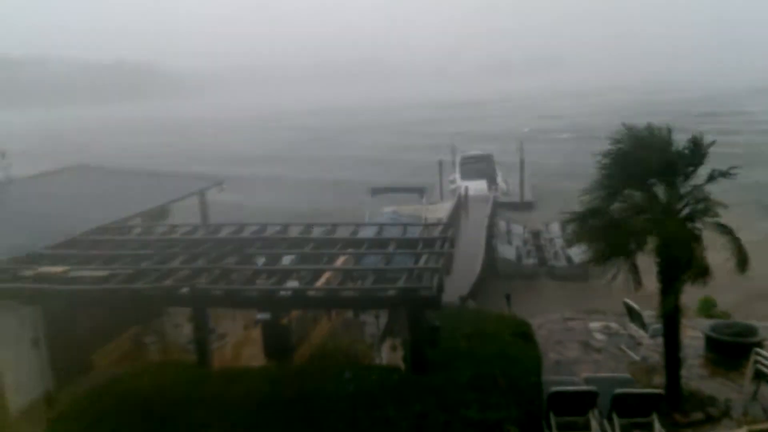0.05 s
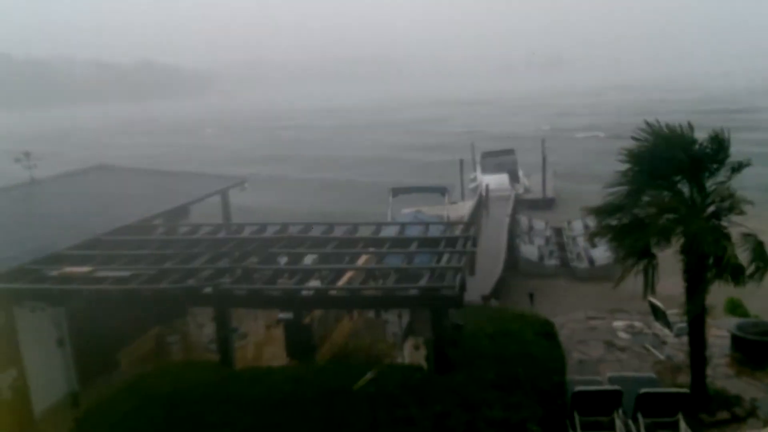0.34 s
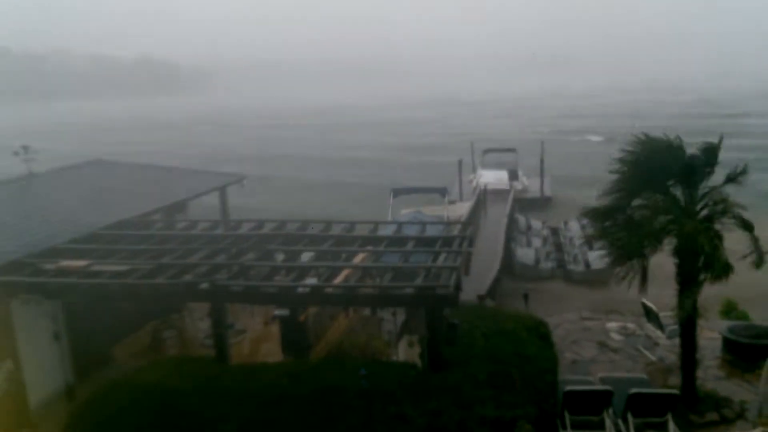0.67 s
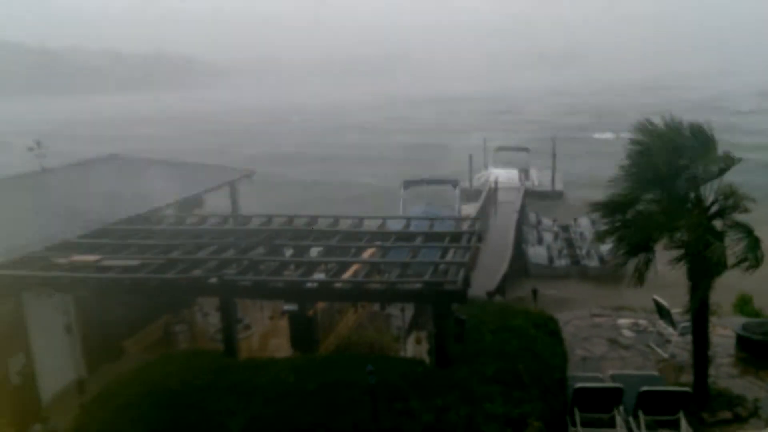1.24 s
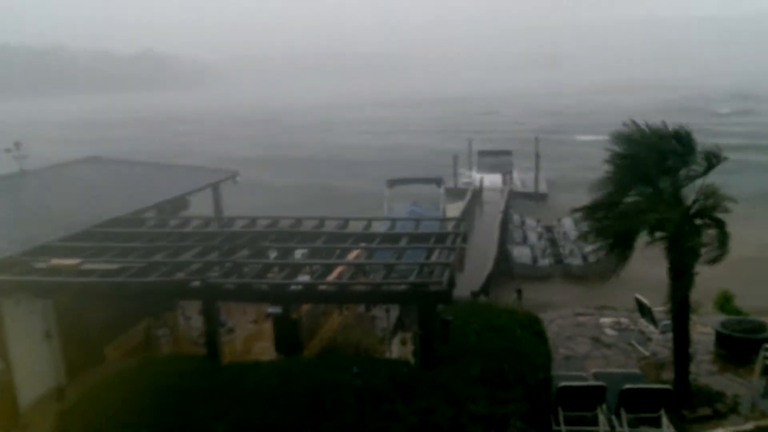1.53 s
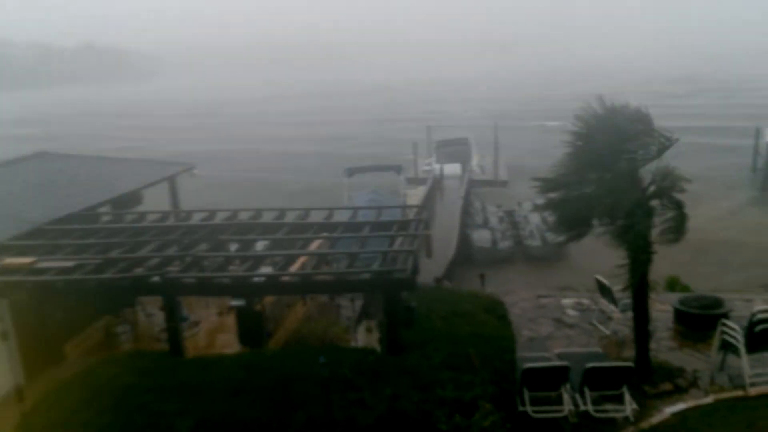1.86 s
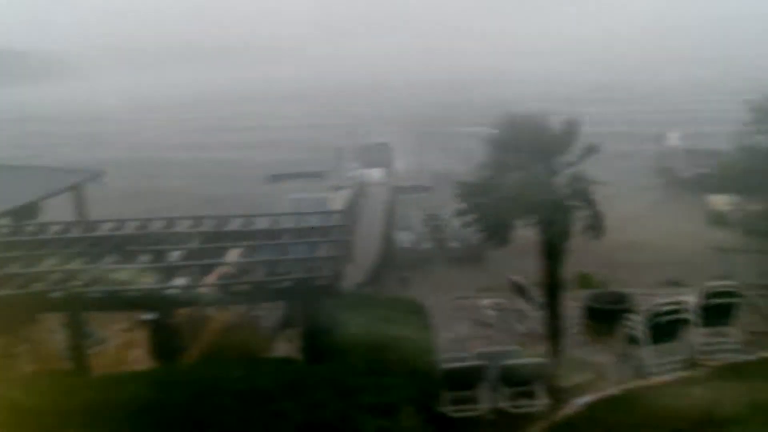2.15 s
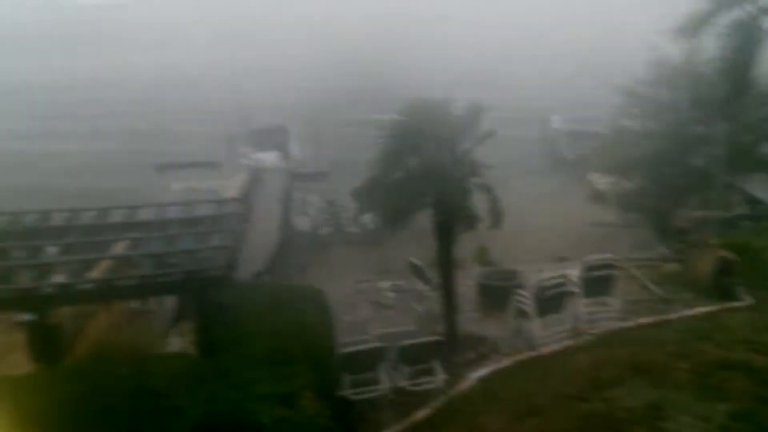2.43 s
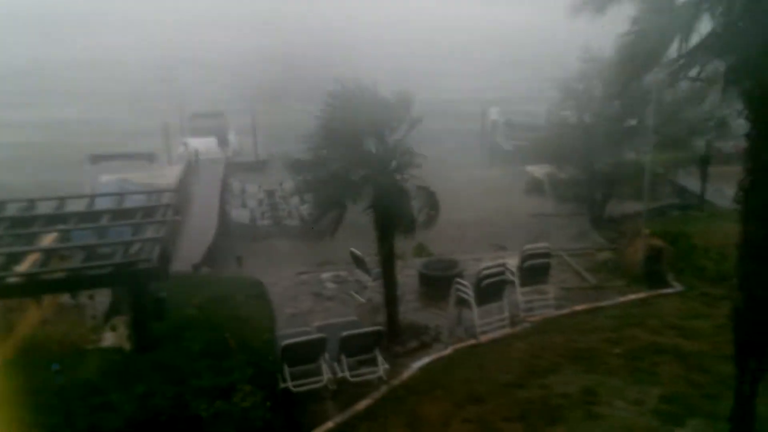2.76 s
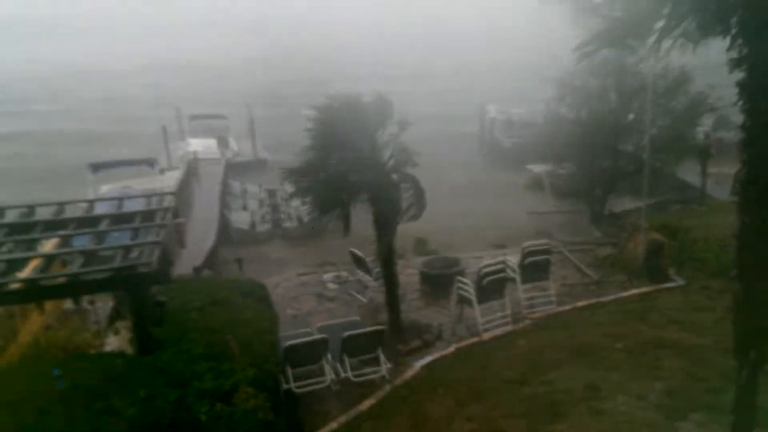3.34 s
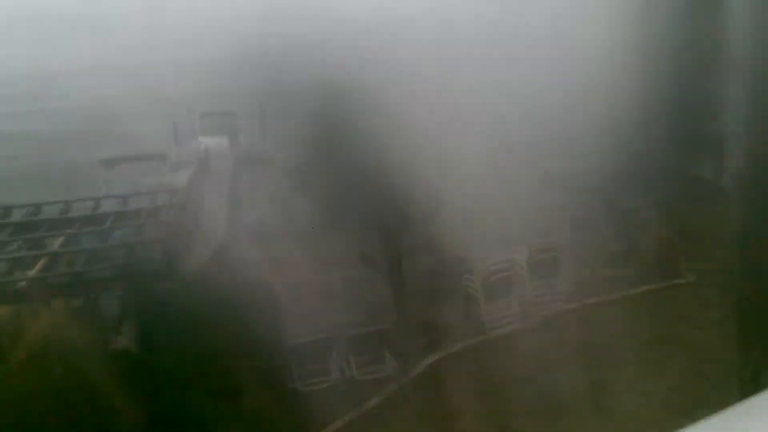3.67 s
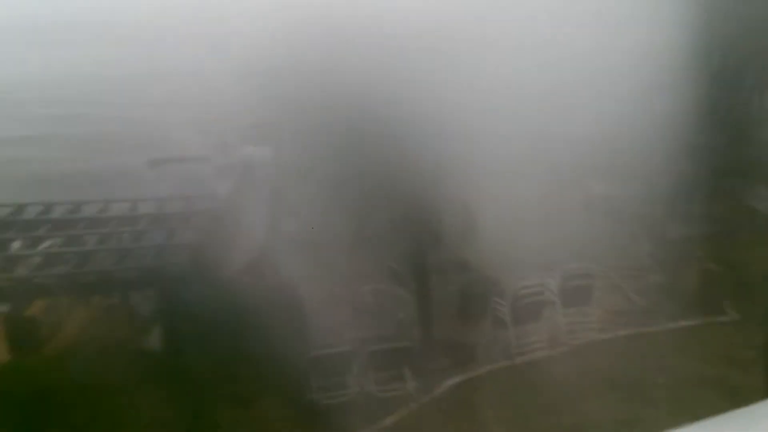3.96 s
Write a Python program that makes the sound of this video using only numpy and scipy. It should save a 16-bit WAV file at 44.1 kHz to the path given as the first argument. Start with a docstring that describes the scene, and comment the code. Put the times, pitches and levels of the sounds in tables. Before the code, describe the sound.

Storm wind buffets the microphone, with rushing rain and crackling spray.

```python
"""Storm wind rumbles and flutters in both ears, driving rain across a lakeside yard straight onto the
two microphone ports of a hand-held camera. Eddies buffet each port on its own. The right port hears
the rush of rain and spits with spray; water seals it for an instant, then for good at about 2.7 s,
and gusts flap the film. The left port is wet throughout and thumps under the big eddies.
A wet port sounds hollow and dull, and drops tick on it."""
import sys
import numpy as np
from scipy import signal
from scipy.fft import rfft, irfft
from scipy.io import wavfile
from scipy.ndimage import uniform_filter1d, minimum_filter1d

SR = 44100
rng = np.random.default_rng(int(sys.argv[2]) if len(sys.argv) > 2 else 0)


def int16_out(signal):
    """Quantize to a 16-bit WAV file."""
    q = np.round(np.clip(np.atleast_2d(signal).T, -1, 1) * 32767)
    wavfile.write(sys.argv[1], SR, q.astype(np.int16))


N = 176400

# Colour of wind fluttering on a film of water. Each row: frequency in Hz, relative level in dB.
FILM_FLUTTER = [(100, 3.5), (400, 3), (800, 1.5), (1300, 5.5), (1700, -5.5), (2300, -17), (3200, -29),
                (5000, -44), (9000, -75), (16000, -85)]
# Colour of rain heard through a wet port. Each row: frequency in Hz, relative level in dB.
MUFFLED_RAIN = [(200, 2.5), (700, 18.5), (1300, -7), (2300, -9), (3200, -30), (4300, -68), (6000, -71),
                (7300, -37), (10000, -63), (16000, -46)]
LEFT, RIGHT = 0, 1


def from_db(db):
    return 10 ** (np.asarray(db) / 20)


def unit_rms(x):
    return x / np.sqrt(np.mean(x ** 2) + 1e-20)


def low_pass(x, hz, order):
    return signal.sosfilt(signal.butter(order, hz, fs=SR, output="sos"), x)


def automation(rows):
    """One curve per column, drawn through rows that begin with a time in seconds."""
    times, *columns = np.transpose(rows)
    return [np.interp(np.arange(N) / SR, times, column) for column in columns]


def on_port(rows, side):
    """The events that strike one port, without the port column."""
    return [row[:-1] for row in rows if round(row[-1]) == side]


def noise(colour):
    """Noise of the given colour at an rms of 1."""
    hz, db = np.transpose(colour)
    bins = np.maximum(np.arange(N // 2 + 1) * SR / N, 1)
    gain = from_db(np.interp(np.log(bins), np.log(hz), db)) * np.minimum(bins / hz[0], 1)
    return unit_rms(irfft(rfft(rng.standard_normal(N)) * gain, N))


def drift(rate_hz):
    """A smooth random wander at an rms of 1."""
    return unit_rms(low_pass(rng.standard_normal(N + SR), rate_hz, order=2)[SR:])


def bursts(rows):
    """Envelope of bell-shaped bursts. Each row: centre in seconds, level in dB, length in seconds."""
    power = np.zeros(N)
    for s, db, length in rows:
        i = np.arange(max(int((s - 2 * length) * SR), 0), min(int((s + 2 * length) * SR), N))
        power[i] += from_db(db) ** 2 * np.exp(-np.pi * ((i / SR - s) / length) ** 2)
    return np.sqrt(power)


def shower(per_s, floor_db, spread_db, mean_length_s):
    """Envelope of drops landing at random times, most of them small."""
    gap_draw, size_draw, length_draw = rng.random((600, 3)).T
    times = np.cumsum(-np.log(gap_draw)) / per_s
    levels = floor_db + spread_db * np.minimum(-np.log(size_draw), 3)
    lengths = mean_length_s * (.5 + length_draw)
    return bursts(np.column_stack([times, levels, lengths])[times < N / SR])


def eddies(swing_db):
    """Gain of eddies tumbling past a port: quick lumps around a steady mean power."""
    lumps = from_db(swing_db * np.clip(drift(rate_hz=93), -3, 2))
    return lumps / np.sqrt(uniform_filter1d(lumps ** 2, size=4000))


def wind(side, gust_db, rumble_colour, flutter_colour, rumble_db, flutter_db, eddy_db, rumble_follow):
    """Low pressure swings and a lumpy flutter rise with the gust; single hard eddies punch through."""
    # Hard eddies. Each row: time in seconds, relative level in dB, port (0 left, 1 right).
    punches = [(0.046, -13, 0), (0.075, -7, 1), (0.132, 0, 1), (0.189, -5, 1), (0.204, -7, 0),
               (0.355, -5.5, 0), (0.393, -5, 0), (0.395, -2.5, 1), (0.579, -5, 0), (0.877, -10, 0),
               (0.949, -2, 1), (1.137, -4.5, 0), (1.158, 1, 1), (1.4, -9, 0), (1.552, -8.5, 0),
               (1.592, -7.5, 0), (1.908, -9, 0), (2.332, -7, 1), (2.55, -5.5, 0), (3.003, -7, 0),
               (3.101, -9, 0), (3.213, -4, 0), (3.255, -5, 0), (3.349, -2, 0), (3.61, -7, 0),
               (3.662, -5.5, 0), (3.994, -6, 0)]
    buffets = bursts([(s, db - 1.5, 0.0084) for s, db in on_port(punches, side)])
    lumps = eddies(eddy_db)
    swell_db = rumble_follow * (gust_db - np.median(gust_db)) + 2.5 * drift(rate_hz=12.6)
    rumble = from_db(rumble_db + swell_db) * lumps ** 0.35 * noise(rumble_colour)
    air = noise(flutter_colour)
    body = signal.sosfiltfilt(signal.butter(2, 830, fs=SR, output="sos"), air)
    fizz = (air - body) * (lumps / 2) ** 0.31  # the top opens up with the hardest eddies
    flutter_gain = from_db(flutter_db + gust_db) * lumps
    return rumble + np.hypot(flutter_gain, buffets) * (body + fizz)


def singing_rain():
    """Rain hiss sings in the left port's resonance, which moves with the water in it."""
    # Each row: time in seconds, frequency in Hz, level in dB.
    resonance = [(0, 5930, -77), (1.8, 5570, -65), (2.8, 6000, -65), (3.08, 5500, -50), (3.26, 5400, -55),
                 (3.6, 5200, -62), (4, 5600, -59)]
    # Broad hiss around it. Each row: frequency in Hz, relative level in dB.
    skirt = [(2000, 0), (4500, 0), (6000, -16), (7500, -5), (10000, -26), (16000, -9)]
    hz, db = automation(resonance)
    width_hz = 600
    phase = 2 * np.pi * np.cumsum(hz) / SR
    crest = drift(width_hz / 2) * np.cos(phase) + drift(width_hz / 2) * np.sin(phase)
    return from_db(db) * (crest + from_db(-4) * noise(skirt))


def rain_rush():
    """The rush of rain swells and sinks through the open port."""
    # Each row: time in seconds, level in dB that the rain wavers around.
    swells = [(0, -30), (.4, -32), (.7, -26), (1.2, -45), (1.6, -24), (1.85, -35), (2.3, -27),
              (2.62, -24.5)]
    # Each row: frequency in Hz, relative level in dB.
    colour = [(200, 24.5), (700, 14.5), (1300, -1), (2300, -13), (3200, -0.5), (4400, 1.5), (5600, 8),
              (6300, 2.5), (7300, -6.5), (10000, -14), (16000, -35)]
    level_db = automation(swells)[0] + 2.3 * drift(rate_hz=1.4)
    return from_db(level_db) * noise(colour)


def struck_port(envelope, modes, crack_db, dull_hz):
    """Water hits ring the port's resonances; a little of the bare crack gets past them."""
    strike, crack = envelope * rng.choice([-1, 1], (2, N)) + 1e-18
    ring = 0
    for k, (hz, width_hz, db) in enumerate(modes):
        radius = np.exp(-np.pi * width_hz / SR)
        feedforward = np.array([1, 0, -1]) * (1 - radius ** 2) / 2
        feedback = [1, -2 * radius * np.cos(2 * np.pi * hz / SR), radius ** 2]
        ring = ring + (-1) ** k * from_db(db) * signal.lfilter(feedforward, feedback, strike)
    return low_pass(ring, dull_hz, order=4) + from_db(crack_db) * low_pass(crack, hz=8200, order=1)


def spray(gust_db, is_open):
    """Water torn up in the right port: big spits and, while it is open, sizzle and fine spray."""
    # Bursts of spray. Each row: time in seconds, relative level in dB, length in milliseconds.
    spit_hits = [(0.034, 15, 1.5), (0.132, -1, 1.9), (0.143, -9, 1), (0.185, 3, 1.7), (0.217, 4, 1.7),
                 (.394, -13, 1.7), (0.41, -14.5, 1.5), (0.545, -22, 3.9), (0.587, -13, 0.96),
                 (.623, -18.5, 1), (0.741, -12, 1.3), (0.825, -20, 3.5), (.837, -10, 1.1),
                 (0.895, -10, 1.6), (.951, -11, 0.7), (.981, -4, 0.56), (1.016, -17, 1.7),
                 (1.071, -12, 2.8), (1.09, -13, 2), (1.12, -15, 1.6), (1.155, -6, 2.1), (1.173, 3, 2.1),
                 (1.211, -21.5, 3.7), (1.22, 3, 0.86), (1.298, -3, 1.6), (1.329, -12, 1.1),
                 (1.412, -15, 1.4), (1.467, -17, 1.4), (1.476, -20, 2), (1.655, -12, 0.95),
                 (1.764, -9, 1.6), (1.912, -10, 1.2), (1.961, -17, 4.3), (1.976, -15, 1.6),
                 (2.012, -9, 0.77), (2.194, -15, 0.58), (2.224, -14.5, 5.2), (2.239, -5, 0.96),
                 (2.277, -12, 3.6), (2.359, -17, 1.0), (2.669, 0, 3.6)]
    # Longer bursts. Each row: time in seconds, relative level in dB, length in seconds.
    splatters = [(.19, -15, 0.0084), (.55, -20.5, 0.015), (.945, -24.5, 0.011), (1.16, -23, 0.011),
                 (1.29, -18.5, 0.023), (1.475, -20.5, 0.019)]
    # Resonances of the open port. Each row: frequency in Hz, width in Hz, gain in dB.
    open_modes = [(1470, 910, 9), (3500, 2470, 4.5), (5500, 1300, 8.5)]
    spits = bursts([(s, db + 5, ms / 1000) for s, db, ms in spit_hits])
    halos = [(s, db - 32.5, 0.014) for s, db, _ in spit_hits]  # a short sizzle wraps each spit
    grain = from_db(7 * drift(rate_hz=400))
    sizzle = bursts(halos + list(splatters)) * grain
    fine = shower(per_s=45, floor_db=-26.5, spread_db=5, mean_length_s=0.00071)
    fine *= from_db(0.15 * (gust_db - np.median(gust_db)))
    return struck_port(spits + is_open * (sizzle + fine), open_modes, crack_db=-9, dull_hz=6140)


def thumps():
    """Big slow eddies thump the left port: a swing or two of low pressure at a wandering pitch."""
    # Each row: time in seconds, relative level in dB, port (0 left, 1 right). Only the left rows play.
    big_eddies = [(0.046, -7, 0), (0.05, 1.5, 1), (0.129, -3, 1), (0.213, -6, 0), (0.285, -6, 1),
                  (0.313, -9, 0), (0.573, -5, 1), (0.636, 5, 1), (0.69, 0, 1), (0.758, -14, 1),
                  (0.803, 2, 1), (0.855, -12, 0), (0.958, -4, 1), (1.046, -4, 0), (1.303, -3, 1),
                  (2.415, 4, 1), (2.616, 0, 1), (2.748, -8, 0), (3.054, -10.5, 0), (3.251, -5, 1),
                  (3.659, -5, 0), (3.737, -10, 0), (3.837, -16, 0)]
    envelope = bursts([(s, db + 3.5, .016) for s, db in on_port(big_eddies, LEFT)])
    hz = 142 * 2 ** (0.38 * drift(rate_hz=40.04))
    return envelope * np.sin(2 * np.pi * np.cumsum(hz) / SR)


def drops(side, modes):
    """Single drops, splashes and a light patter ring a wet port."""
    # Drop strikes. Each row: time in seconds, relative level in dB, port (0 left, 1 right).
    ticks = [(1.402, -18, 0), (2.55, -17, 0), (2.887, -24.5, 0), (3.21, -21.5, 0), (3.364, -27.5, 0),
             (3.259, -19, 1), (3.371, -21.5, 1), (3.414, -21.5, 0), (3.598, -28, 0), (3.614, -16.5, 1),
             (3.703, -20, 0), (3.744, -17, 0), (3.785, 13, 1), (3.861, -16, 1), (3.878, -11, 1),
             (3.962, -28, 0)]
    # Each row: time in seconds, relative level in dB, length in seconds, port.
    splashes = [(1.716, -19, .02, 1), (2.677, -20, 0.0031, 0), (3.208, -22, 0.0085, 0),
                (3.787, -4, 0.0024, 1), (3.871, -19.5, 0.0084, 1)]
    tick_s = 0.00081
    hits = bursts([(s, db + 8.5, tick_s) for s, db in on_port(ticks, side)] + on_port(splashes, side))
    patter = shower(per_s=18, floor_db=-53, spread_db=11, mean_length_s=tick_s)
    return struck_port(np.hypot(hits, patter), modes, crack_db=-6, dull_hz=7100)


def prickles():
    """The finest droplets make thin, bright ticks on the film that seals the right port."""
    # Each row: frequency in Hz, relative level in dB.
    colour = [(3000, -11), (6000, 0), (10000, -3), (15000, 4)]
    return shower(per_s=22, floor_db=-38.5, spread_db=6.5, mean_length_s=0.00071) * noise(colour)


def film_flaps():
    """Wind level in dB as gusts flap the sealing film: abrupt starts and stops, with lulls between."""
    # Each row: start in seconds, length in seconds, relative level in dB.
    flaps = [(2.725, 0.056, -14.5), (2.789, .025, -5.5), (2.815, 0.034, -26), (2.868, 0.047, -16),
             (2.92, 0.062, -11.5), (3.076, .12, -25.5), (3.117, 0.033, -17), (3.246, .027, -15),
             (3.304, 0.068, -19), (3.438, 0.087, -16), (3.518, .035, -11.5), (3.571, 0.036, -18.5),
             (3.632, 0.036, -17.5), (3.696, 0.023, -14.5), (3.774, 0.035, -15), (3.795, 0.21, -23),
             (3.846, 0.11, -17.5)]
    attack_s, release_s, lull_db = 0.0037, 0.007, -33.5
    t = np.arange(N) / SR
    gain = from_db(lull_db)
    for start, length, db in flaps:
        edges = np.minimum((t - start) / attack_s, (start + length - t) / release_s)
        gain = gain + from_db(db) * np.clip(.5 + edges, 0, 1)
    return 20 * np.log10(gain)


def left_port():
    """Wet throughout: hollow buffeting, muffled rain, ticks and thumps."""
    # Each row: time in seconds, relative wind level in dB.
    gusts = [(0, -17.5), (.4, -19), (.47, -24.5), (.6, -18.5), (1.35, -21.5), (2.5, -18.5), (2.58, -25),
             (2.74, -17.5), (3.18, -24.5), (3.65, -17.5), (4, -23.5)]
    # Wind colours. Each row: frequency in Hz, relative level in dB.
    rumble = [(20, -26), (60, -3.5), (120, -2.5), (250, -9), (450, -15.5), (1000, -23), (3000, -74)]
    flutter = [(100, -6), (400, -1.5), (720, 3), (1000, -3), (1300, -9), (1700, -17.5), (2300, -27),
               (3200, -38), (5000, -43), (9000, -58), (16000, -81)]
    # Resonances of the wet port. Each row: frequency in Hz, width in Hz, gain in dB.
    wet_modes = [(1400, 370, 18), (5620, 860, 8.4)]
    gust_db, = automation(gusts)
    eddy_db, thin_film_until_s = 7.5, 0.452
    air = wind(LEFT, gust_db, rumble, flutter,
               rumble_db=-18, flutter_db=0, eddy_db=eddy_db, rumble_follow=0.32)
    # At first a thin film makes the port ring higher.
    is_thin = uniform_filter1d(1.0 * (np.arange(N) / SR < thin_film_until_s), size=400)
    thin_film = is_thin * from_db(gust_db - 1) * eddies(eddy_db) * noise(FILM_FLUTTER)
    rain = from_db(-33) * noise(MUFFLED_RAIN) + singing_rain()
    return air + thin_film + rain + drops(LEFT, wet_modes) + thumps()


def right_port():
    """Bright and crackling while open; hollow whenever a film of water closes it."""
    # Gusts until the port seals for good. Each row: time in seconds, relative level in dB.
    gusts = [(0, -22.5), (.32, -26.5), (.54, -24), (.66, -23.5), (1.3, -20.5), (1.56, -25.5), (1.72, -19.5),
             (1.78, -25), (2.2, -21), (2.64, -26.5)]
    # Water covers the port. Each row: start in seconds, end in seconds.
    seals = [(1.652, 1.764), (2.671, 4.1)]
    # Wind colours. Each row: frequency in Hz, relative level in dB.
    rumble = [(20, -13), (60, 1), (150, 0.5), (250, -4.5), (450, -13.5), (1000, -25), (3000, -69.5)]
    open_flutter = [(100, 1.5), (350, 0.5), (700, -1.5), (1000, -4), (1700, -11), (2300, -13.5),
                    (3200, -19), (5500, -22.5), (7500, -32.5), (16000, -56.5)]
    # Resonances of the sealed port. Each row: frequency in Hz, width in Hz, gain in dB.
    sealed_modes = [(1490, 260, 16), (4600, 360, 0.89)]
    t = np.arange(N) / SR
    is_sealed = uniform_filter1d(sum(1.0 * ((t > start) & (t < end)) for start, end in seals), size=90)
    is_open = 1 - is_sealed
    last_seal_s = seals[-1][0]
    gust_db = np.where(t < last_seal_s, automation(gusts)[0], film_flaps())
    bright = wind(RIGHT, gust_db, rumble, open_flutter,
                  rumble_db=-12.5, flutter_db=5, eddy_db=6, rumble_follow=0.48)
    bright += rain_rush()
    hollow = wind(RIGHT, gust_db, rumble, FILM_FLUTTER,
                  rumble_db=-15.5, flutter_db=2, eddy_db=4.5, rumble_follow=0.31)
    hollow += from_db(-37.5) * noise(MUFFLED_RAIN) + drops(RIGHT, sealed_modes) + prickles()
    return is_open * bright + is_sealed * hollow + spray(gust_db, is_open)


def scene():
    """The two ports side by side, one to each ear."""
    return np.array([left_port(), right_port()])


def record(dry):
    """A very fast limiter holds down each channel's peaks; then the very top is cut."""
    ceiling, cutoff_hz = .93, 17000
    gain = minimum_filter1d(np.minimum(1, ceiling / (np.abs(dry) + 1e-9)), size=91)
    for _ in range(3):
        gain = uniform_filter1d(gain, size=31)
    return signal.sosfilt(signal.cheby2(14, 70, cutoff_hz, fs=SR, output="sos"), dry * gain)


dry = scene()
out = record(dry)
int16_out(out)
```